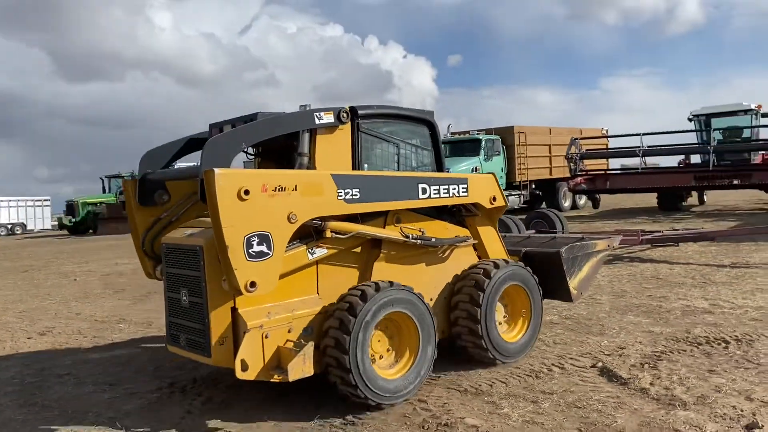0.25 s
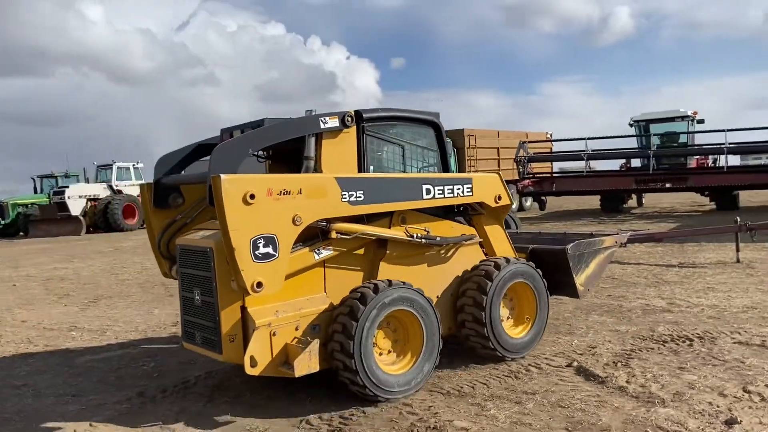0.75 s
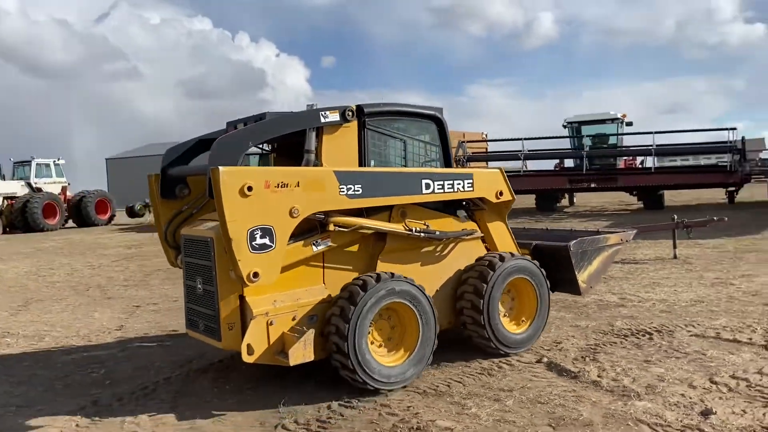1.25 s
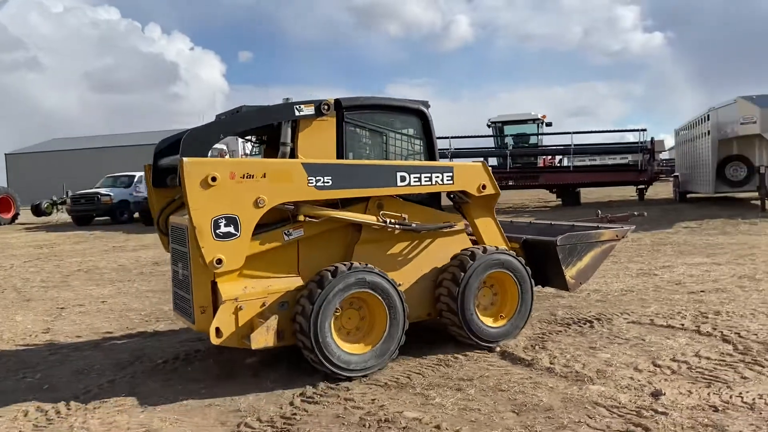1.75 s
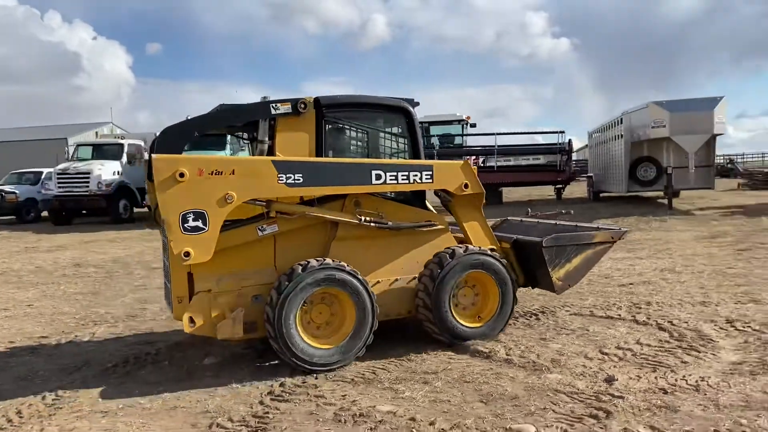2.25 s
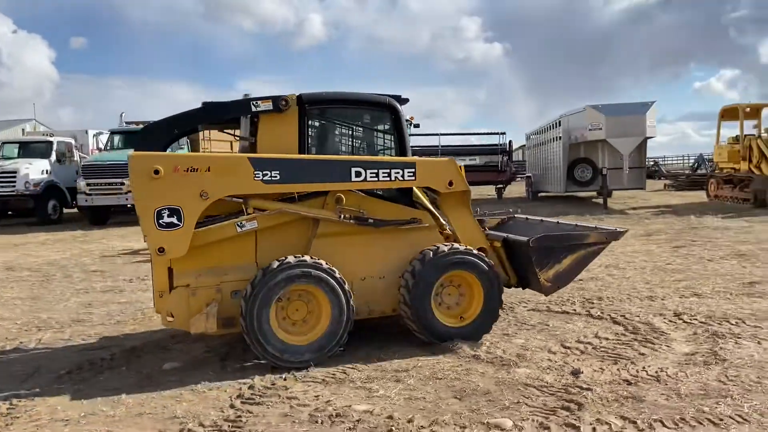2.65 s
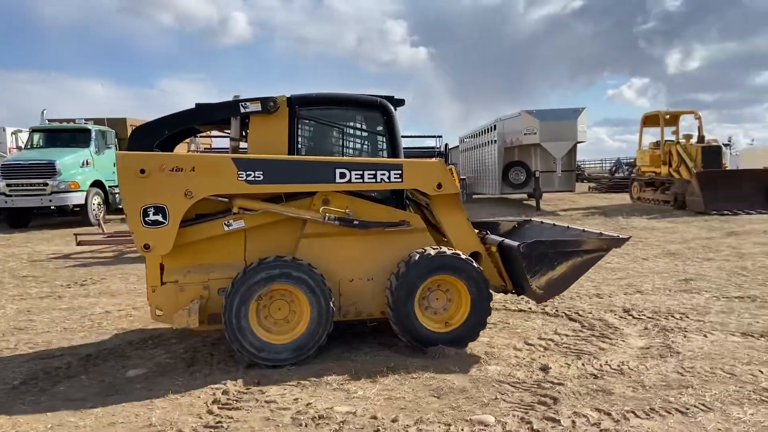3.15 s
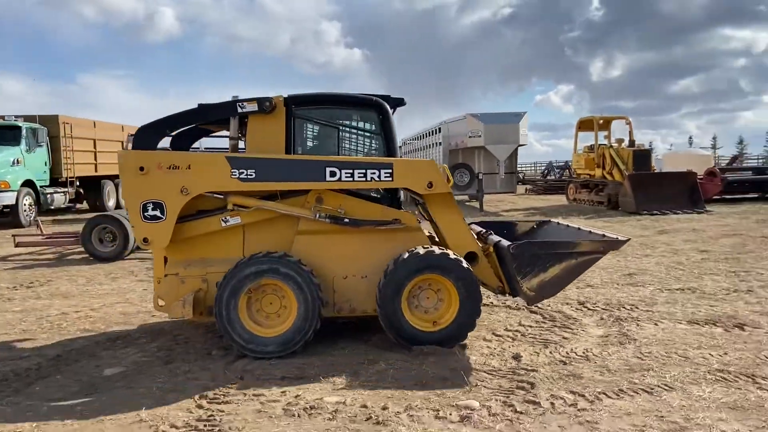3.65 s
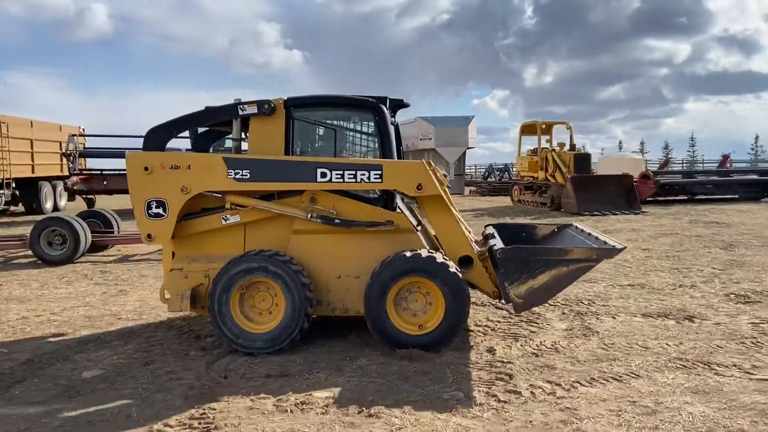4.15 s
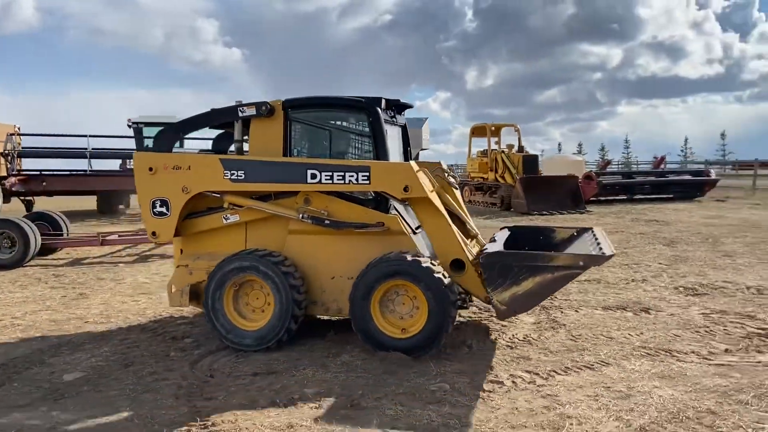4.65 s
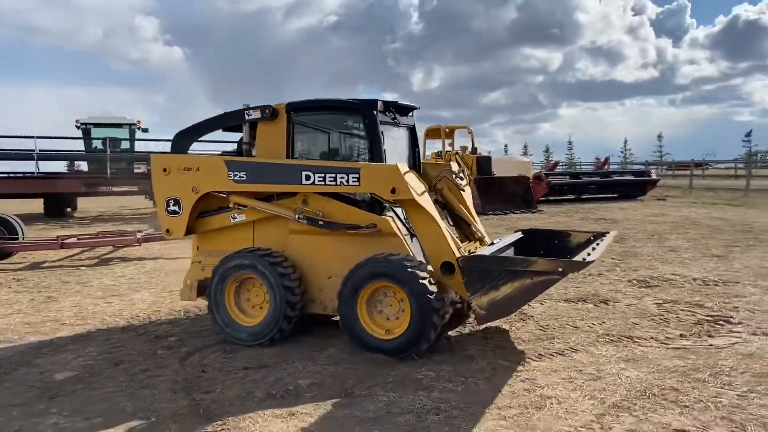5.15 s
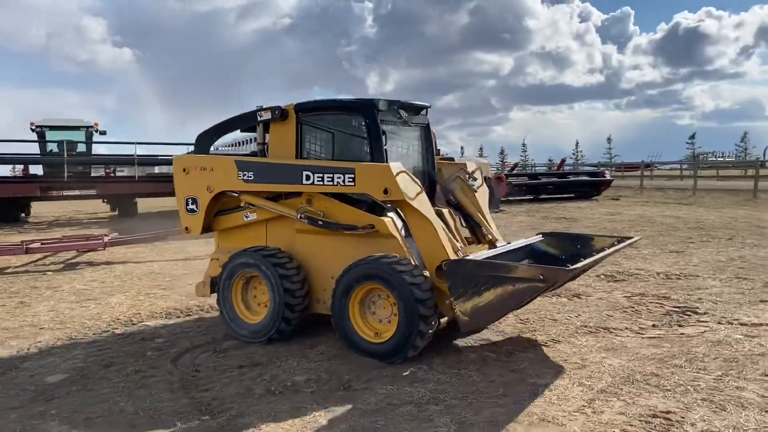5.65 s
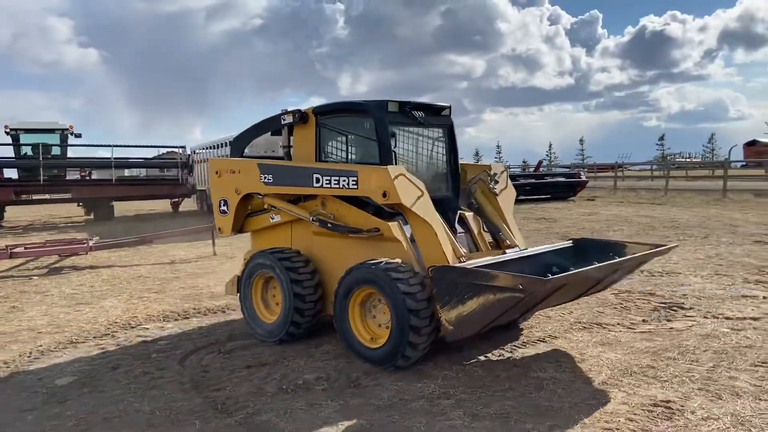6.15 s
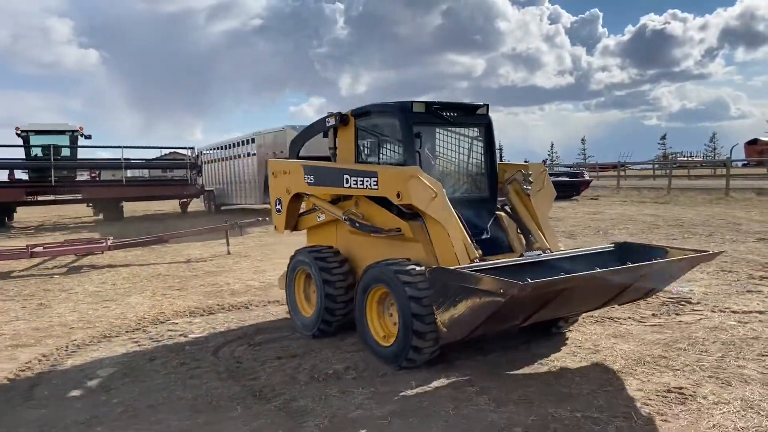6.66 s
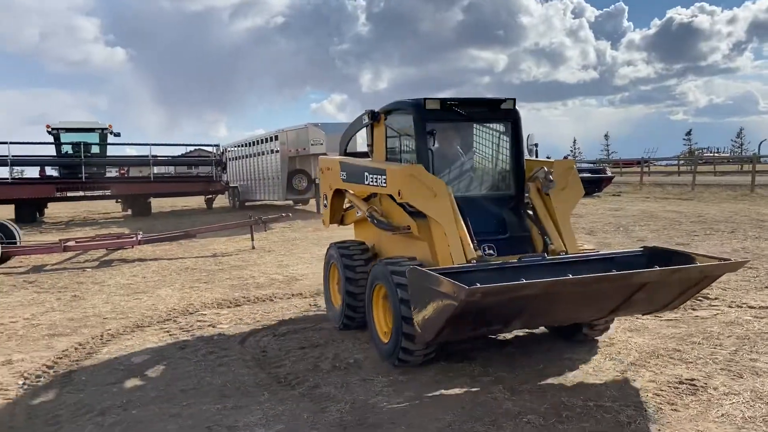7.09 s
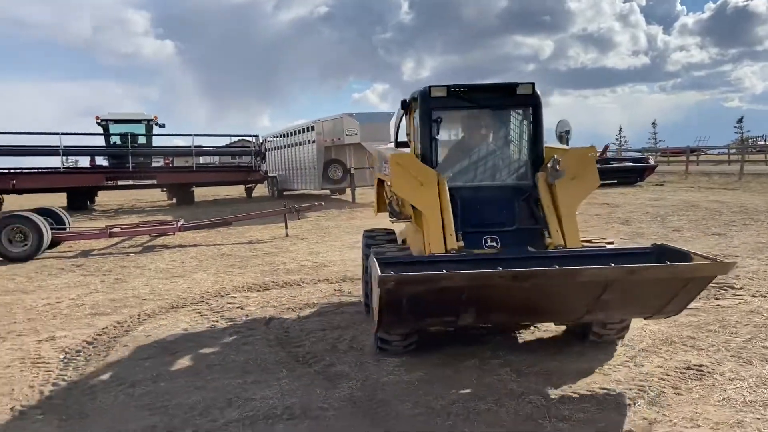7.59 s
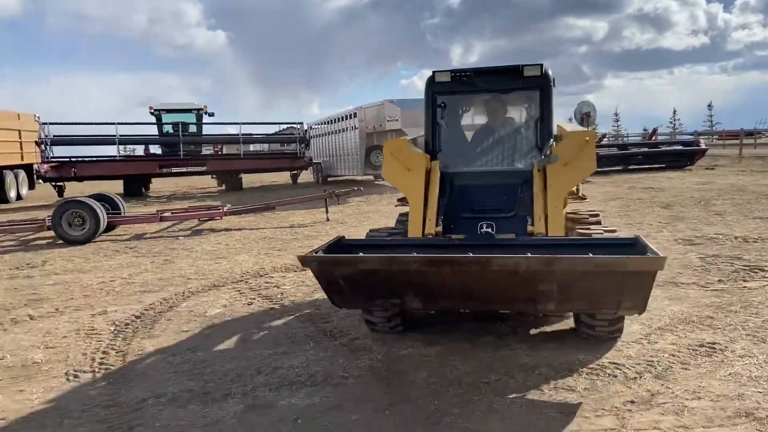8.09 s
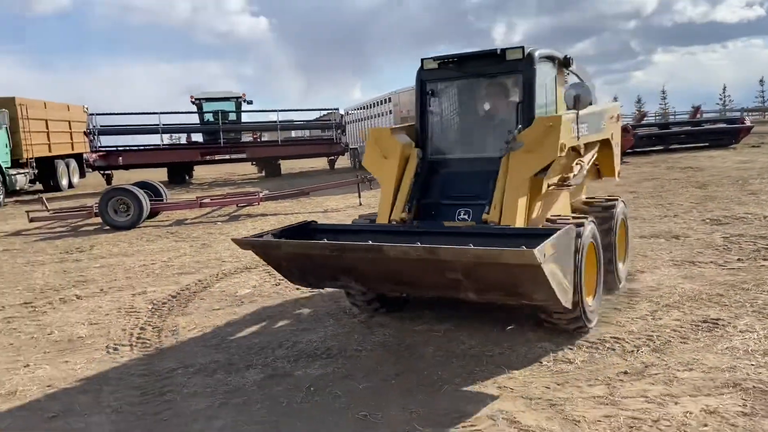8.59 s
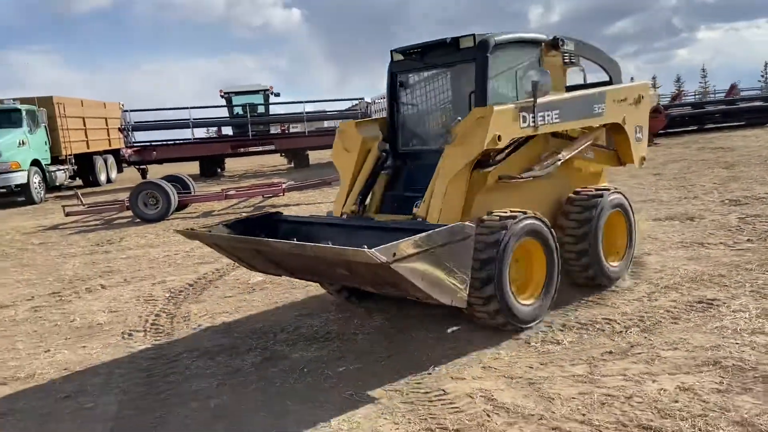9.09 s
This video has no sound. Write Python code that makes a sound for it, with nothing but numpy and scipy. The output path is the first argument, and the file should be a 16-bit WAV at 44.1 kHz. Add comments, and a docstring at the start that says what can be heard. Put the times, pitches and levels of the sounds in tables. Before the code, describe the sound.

Steady diesel engine chug with fan roar, hydraulic whine and metallic clatter as a small loader swings around, amid thumping wind gusts.

```python
"""In an open dirt yard a five-cylinder diesel loader at nearly steady revs turns round, a few metres away.
Sines locked to the engine cycle make the exhaust drone, the whine of a nine-piston pump and the gear whines.
Blows ring the panels of the clattering block; shaped noise makes the fan roar, a rattle and a hiss.
Wind noise buffets and flutters at two microphone ports, and short sagging swings flap there.
The drone dips briefly at listed moments, mostly after gusts."""
import sys
import numpy as np
from scipy import signal
from scipy.fft import rfft, irfft, next_fast_len
from scipy.io import wavfile
from scipy.ndimage import uniform_filter1d, map_coordinates

SR = 44100
rng = np.random.default_rng(int(sys.argv[2]) if len(sys.argv) > 2 else 0)


def int16_out(signal):
    """Quantize to a 16-bit WAV file."""
    q = np.round(np.clip(np.atleast_2d(signal).T, -1, 1) * 32767)
    wavfile.write(sys.argv[1], SR, q.astype(np.int16))


N = 411453
T = np.arange(N) / SR  # time in seconds
FADE_DB_PER_S, WHINE_FADE_DB_PER_S, FLUTTER_FADE_DB_PER_S = 32, 84, 264  # how fast a swell comes and goes


# Engine speed. Each row: time in seconds, four-stroke cycles a second (two crank turns, five firings each).
SPEED = [(0, 15.14), (.4, 15.15), (.7, 15.1), (1.1, 15.08), (1.5, 15.0), (1.95, 15.0), (2.3, 15.06),
         (2.7, 15.04), (3.4, 15.03), (4.3, 15.055), (4.7, 15.02), (5.5, 15.06), (6.7, 15.04), (7.1, 15.06),
         (7.9, 15.045), (8.5, 15.075), (9.33, 15.07)]


def engine_cycles():
    """Phase is the integral of rate: cycles run so far, with a slight random wander."""
    cycles_per_s, = curves(SPEED)
    return np.cumsum(cycles_per_s) / SR - .05 + .004 * wobble(2.5)


# Firing tone. Each row: time in seconds, level in dB before the dips.
FIRING = [(0.0, -18), (0.41, -22), (0.48, -12), (2.15, -11), (2.6, -14), (2.75, -14), (3.05, -13.5),
          (3.28, -13.5), (3.5, -22), (4.03, -18.5), (4.3, -22.5), (4.68, -14), (5.6, -13), (6.0, -17),
          (6.4, -14.5), (6.8, -17), (7.27, -20), (7.59, -31), (7.98, -15), (8.6, -14.5), (9.33, -12.5)]
# Brief dips of the firing tone. Each row: time in seconds, depth in dB.
DIPS = [(1.01, 2), (2.23, 9), (2.831, 19), (2.93, 20), (3.33, 22), (3.39, 14), (3.66, 24), (3.9, 20),
        (4.18, 18), (6.08, 35), (6.97, 16), (8.16, 3), (9.04, 26)]
DIP_FALL_S, DIP_RECOVER_S = 0.024, 0.045  # time constants
# 2nd and 4th multiples of the firing tone.
# Each holds: rest in dB under the roar, then swells of start in seconds, end in seconds, level in dB.
SECOND = (-15.5, [(.95, 2.0, -27), (2.2, 3.2, -31), (4.75, 5.95, -26.5), (6.3, 6.7, -27.5),
          (7.3, 7.4, -32.5), (9.0, 9.33, -32.5)])
FOURTH = (-13, [(1.05, 1.2, -33), (6.0, 6.1, -34), (7.35, 7.4, -33.5), (9.2, 9.33, -26)])


def exhaust_drone(cycles):
    """Harmonic series of a periodic source: five firings a cycle give a tone and its multiples."""
    firing_db, = curves(FIRING)
    for s, depth_db in DIPS:
        time_constant = np.where(T < s, DIP_FALL_S, DIP_RECOVER_S)
        firing_db = firing_db - depth_db * np.exp(-np.abs(T - s) / time_constant)
    levels = firing_db, turning(SECOND, FADE_DB_PER_S), turning(FOURTH, FADE_DB_PER_S)
    return sum(tone(5 * k, cycles, db) for k, db in zip((1, 2, 4), levels))


# Piston tone, then its 3rd, 4th, 5th and 7th multiples.
# Each row: rest in dB under the roar, then swells of start in seconds, end in seconds, level in dB.
PUMP = [(-17, [(.9, 1.2, -34), (1.95, 2.5, -30), (4.7, 5.05, -31.5), (6.3, 7.2, -35.5), (7.65, 8.7, -31.5),
        (9.25, 9.33, -30.5)]), (-24, [(1.7, 1.85, -36), (4.5, 6.0, -52), (7.7, 8.3, -41.5),
        (8.6, 9.1, -42.5)]), (-22, [(5.55, 5.8, -39.5), (8.75, 9.0, -45)]), (-19, [(0.0, .1, -35.5),
        (1.6, 2.2, -40), (5.1, 5.9, -42), (6.3, 6.8, -43), (7.85, 8.1, -41), (8.45, 8.8, -40.5),
        (8.1, 8.4, -44.5)]), (-18, [(.7, 1.5, -44), (5.3, 6.0, -44), (7.9, 8.1, -45), (8.7, 9.05, -46)])]
# 2nd multiple of the piston tone, the clearest whine: rest and swells in the same units.
WHINE = (-20, [(.38, .45, -30), (.5, 1.6, -36.5), (3.7, 4.03, -34), (4.18, 4.35, -36), (4.5, 5.1, -32),
         (5.95, 6.75, -31), (7.33, 7.4, -33.5), (8.1, 8.15, -37), (8.45, 8.55, -35.5), (8.95, 9.33, -33.5)])


def pump_whine(cycles):
    """Flow ripple: nine pistons a crank turn pulse 18 times a cycle, with multiples."""
    levels = [turning(part, FADE_DB_PER_S) for part in PUMP]
    levels.append(turning(WHINE, WHINE_FADE_DB_PER_S))
    return sum(tone(18 * k, cycles, db) for k, db in zip((1, 3, 4, 5, 7, 2), levels))


# Pitch of each gear whine, in multiples of the engine cycle.
GEAR_ORDERS = (69, 80, 109, 119, 42, 115, 105, 125)
# Mean level of each gear whine.
# Each row: rest in dB under the roar, then swells of start in seconds, end in seconds, level in dB.
GEARS = [(-25.5, [(.5, .6, -57), (1.4, 2.3, -43.5), (3.3, 4.4, -42.5), (5.7, 5.9, -48.5)]),
         (-28.5, [(1.5, 2.7, -40.5), (3.3, 4.7, -44)]), (-18, [(0.0, .6, -31), (1.3, 2.4, -36.5),
         (4.8, 5.15, -42), (5.5, 6.1, -42), (6.9, 7.3, -41.5), (9.1, 9.33, -44)]),
         (-17.5, [(.75, 1.1, -34.5), (1.2, 1.5, -29), (1.5, 2.05, -36.5), (2.7, 3.15, -49), (4.0, 4.1, -45),
         (5.3, 5.7, -43), (7.0, 7.3, -43)]), (-25.5, [(0.0, 1.8, -37.5), (5.4, 7.2, -43.5)]),
         (-18.5, [(4.4, 5.7, -42), (6.3, 7.2, -42.5)]), (-21.5, [(1.55, 1.95, -42), (2.4, 2.8, -41),
         (5.7, 6.0, -41), (8.3, 9.0, -46)]), (-26.5, [(.8, 1.6, -40)])]
# Tooth load of each gear. Each row: depth of its swell (0-1), place of the swell in the cycle (0-1).
LOADS = [(.3, 0), (.3, 0), (.5, .22), (.75, .38), (.4, .08), (.4, .3), (.3, .2), (.3, 0)]


def gear_whine(cycles):
    """Amplitude modulation of tooth-mesh tones: the tooth load swells once a cycle."""
    out = 0
    for order, part, (depth, place) in zip(GEAR_ORDERS, GEARS, LOADS):
        load = 1 + depth * np.cos(2 * np.pi * (cycles - place))
        level_db = turning(part, FADE_DB_PER_S) + 2 * wobble(9)
        out = out + load * tone(order, cycles, level_db)
    return out


# Relative blow strength in dB of each firing in turn.
CYLINDERS = [-13.5, 10, -1.5, 8.5, 0]


def firing_knocks(cycles):
    """Impulsive excitation: one blow a firing, unequal from cylinder to cylinder."""
    firing = (cycles * 5).astype(int)
    begins = np.diff(firing, prepend=0) > 0
    return begins * amp(np.array(CYLINDERS)[firing % len(CYLINDERS)] + 1.6 * wobble(75))


TICKS_DRIFT = .13  # turns a second by which the tick pattern changes


def valve_ticks(cycles):
    """Cyclic repetition: a noise pattern fixed to the cycle, turning slowly into another one."""
    slots = 2900  # noise values in one cycle
    place = (cycles % 1 * slots).astype(int)
    first, second = rng.standard_normal((2, 2, slots))[..., place]
    angle = 2 * np.pi * TICKS_DRIFT * T
    return np.cos(angle) * first + np.sin(angle) * second


# Modes of each panel. Each row, mode by mode: centre in Hz, width in Hz before squaring, level in dB.
PANELS = [
    [(632, 70, 0)],
    [(815, 115, 0)],
    [(1580, 18, -12), (1652, 40, 0)],
    [(1725, 30, 0)],
    [(1792, 42, 0)],
    [(1885, 30, -2), (1955, 30, -4), (2030, 40, 0), (2150, 150, -7)],
    [(2343, 40, 0)],
    [(3750, 700, 0)],
    [(5600, 1200, 0)],
]
# Mean level of each panel, which swells as it faces the listener.
# Each row: rest in dB under the roar, then swells of start in seconds, end in seconds, level in dB.
FACING = [(-21.5, [(0.0, 1.2, -34.5), (5.5, 5.6, -44), (7.2, 7.35, -42.5)]), (-16, [(.7, 1.2, -41.5),
          (4.4, 7.2, -36.5), (7.55, 7.9, -46)]), (-14, [(0.0, .3, -29), (1.25, 1.75, -32.5),
          (4.7, 6.1, -37.5)]), (-16, [(0.0, .8, -36), (4.4, 7.5, -37.5)]), (-21.5, [(1.1, 2.0, -32),
          (2.6, 3.3, -44), (3.8, 4.2, -41.5), (5.3, 5.7, -38.5), (7.0, 7.3, -37)]), (-17, [(0.0, 1.6, -33),
          (3.0, 3.3, -43), (2.15, 2.4, -33.5), (5.0, 7.6, -40.5), (7.0, 7.48, -34.5), (8.75, 9.1, -39.5)]),
          (-25, [(0.0, 1.4, -35)]), (-37, [(0.0, 2.03, -47), (2.9, 7.1, -52.5)]),
          (-46.5, [(7.0, 7.4, -57.5), (8.2, 9.0, -63)])]
# Place in the cycle (0-1) at which each panel is struck hardest.
STRUCK_AT = [.08, .56, .24, .3, .38, .0, .0, .0, .0]
STRUCK_DB = 2.2  # swing of the blows over the cycle, up and down


def panel_response(modes, f):
    """Modal resonance, squared: stiff panels radiate little away from their modes."""
    return sum(amp(db / 2) * 1j * f * w / (c * c - f * f + 1j * f * w) for c, w, db in modes) ** 2


def clatter(cycles, ticks):
    """Modal excitation: firing knocks, valve ticks and loose noise ring the panels."""
    blows = .6 * unit(firing_knocks(cycles)) + ticks + .55 * rng.standard_normal((2, N))
    blows = patchy(blows, 2.5, bins=2, frames=40)
    out = 0
    for modes, facing, place in zip(PANELS, FACING, STRUCK_AT):
        struck = blows * amp(STRUCK_DB * np.cos(2 * np.pi * (cycles - place)))
        ring = filtered(struck, lambda hz: panel_response(modes, hz))
        out = out + amp(turning(facing, FADE_DB_PER_S)) * even(ring)
    return out * amp(wobble(8))


# Roar spectrum. Each row: frequency in Hz, relative level in dB per Hz.
ROAR = [(150, -53), (350, -3.5), (640, 3.5), (950, 0), (1310, 2), (1480, 1.5), (2300, -5), (2700, -50.5),
        (5000, -120)]
# Hiding of the engine bay by the cab. Each row: time in seconds, share hidden (0-1).
SHADE = [(0, 0.07), (4.4, 0), (6.2, 0.8), (8.6, 0.93), (9.33, 0.55)]
# Gain of the hidden share. Each row: frequency in Hz, gain in dB.
SHADOW = [(800, 0.5), (1000, -3), (1250, -3), (1500, -1.5), (2000, 2.5)]


def fan_roar(cycles, ticks):
    """Broadband noise, partly repeating with the cycle so faint lines show, then acoustic shadow of the cab."""
    roar = noise(ROAR) + 1.1 * coloured(ticks, ROAR)
    roar = unit(patchy(roar, 2.0, bins=5, frames=40) * beat(cycles, 0.22, 0.22))
    shade = np.clip(curves(SHADE)[0], 0, 1)
    return (1 - shade) * roar + shade * coloured(roar, SHADOW)


# Rattle spectrum. Each row: frequency in Hz, relative level in dB per Hz.
RATTLE = [(1800, -65), (2400, 2.5), (2750, -4.5), (3200, -2), (3700, -12.5), (4300, -32), (7000, -120)]


def rattle_noise(cycles, ticks):
    """Cyclic modulation: band noise, partly repeating, beats with cycle and firing."""
    rattle = noise(RATTLE) + 0.78 * coloured(ticks, RATTLE)
    return unit(patchy(rattle, 2.7, bins=5, frames=30) * beat(cycles, 0.25, 0.3))


# Hiss spectrum. Each row: frequency in Hz, relative level in dB per Hz.
HISS = [(2800, -60), (3900, -8), (4600, -1), (5000, 0), (6300, -4), (6900, -2), (7200, 2), (7600, -2),
        (9000, -5), (9700, -10), (11000, -11), (12400, -16), (14800, -20), (15300, -28), (16000, -30)]


def hiss_noise(cycles):
    """Amplitude modulation of high noise: it beats with the cycle and flickers at random."""
    flicker = amp(0.65 * wobble(8) + 0.73 * wobble(4))
    hiss = patchy(noise(HISS), 1.5, bins=8, frames=25)
    return unit(hiss * beat(cycles, 0.94, 0.63) * flicker)


# A squeak and a clank of steel.
# Each row: start in seconds, level in dB before rise and decay, pitch in Hz, rise in seconds, t60 in seconds.
PINGS = [(1.766, -27.5, 4360, 0.0051, 0.095), (8.372, -14, 630, 0.0048, 0.087),
         (8.37, -18, 900, 0.005, 0.062)]


def squeak():
    """Free decay: loose steel parts ring as sines that rise softly and die exponentially."""
    out = 0
    for s, db, hz, rise, t60 in PINGS:
        t = np.maximum(T - s, 0)
        decay = amp(db - 60 * t / t60)
        out = out + decay * (1 - np.exp(-t / rise)) ** 2 * np.sin(2 * np.pi * hz * t)
    return out


# Levels of the body noise. Each row: time in seconds, roar in dB before the cab's shadow, rattle in dB,
# hiss in dB.
BODY = [(0.0, -26, -36, -40), (1.38, -23, -37.5, -40), (1.97, -26, -41, -42), (3.14, -28.5, -47, -46.5),
        (4.31, -28.5, -44, -44.5), (4.91, -31, -46, -46), (7.25, -29.5, -44, -46), (7.59, -35, -48, -55),
        (8.37, -34.5, -47.5, -53.5), (9.33, -30.5, -41.5, -46.5)]
# Likeness of the ports. Each row: frequency in Hz, correlation of the body sound (0-1).
ALIKE = [(300, .9), (2000, .88), (2800, .65), (3500, .8), (5500, .4), (7500, .75), (8400, 1), (10000, 1),
         (10800, .7), (11800, 1), (13300, 1), (13800, .5), (14300, 1)]


def engine():
    """Superposition of all that the machine radiates, before it reaches the ports."""
    cycles = engine_cycles()
    ticks = valve_ticks(cycles)
    roar_db, rattle_db, hiss_db = curves(BODY)
    body = clatter(cycles, ticks) + amp(roar_db) * fan_roar(cycles, ticks)
    body = body + amp(rattle_db) * rattle_noise(cycles, ticks) + amp(hiss_db) * hiss_noise(cycles)
    tones = exhaust_drone(cycles) + pump_whine(cycles) + gear_whine(cycles)
    return blend(body, ALIKE) + tones + squeak()


# Side of the machine. Each row: time in seconds, direction from left (0) to right (1).
TURN = [(0, 0), (4.5, 0), (6.5, 0.16), (7.2, 0.36), (7.9, 0.67), (8.5, 1), (9.33, 1)]
# Phase between the ports for either side. Each row: frequency in Hz, lead of the left port in radians.
LEAD_LEFT = [(100, 0), (700, .2), (1400, .7), (1800, 1.3), (2400, 1.4), (2750, .9), (3100, -.2),
             (4800, -.3), (5500, 1.2), (6800, .8), (7250, 1.6), (8400, 3.14), (10000, 3.14), (11600, 6.28),
             (13400, 6.28), (14200, 9.42)]
LEAD_RIGHT = [(100, 0), (700, -.2), (1400, -.3), (1800, -1), (2400, -1.3), (5500, -1), (6200, -.1),
              (6900, 0), (7750, 2.6), (8400, 3.14), (10000, 3.14), (11600, 6.28), (13400, 6.28),
              (14200, 9.42)]
# Level between the ports for either side. Each row: frequency in Hz, left minus right in dB.
TILT_LEFT = [(1400, 0), (2400, -1), (3000, 3), (3700, -1), (4200, -2), (5200, -9), (6200, -2), (7200, 3),
             (8200, 0)]
TILT_RIGHT = [(300, 0), (1000, -4), (2400, -4), (3000, -6), (3700, -2), (5500, -4), (6500, 0)]


def seen(x, lead, tilt):
    """Interaural-style cues: half of the phase and level difference goes to each port."""
    half = np.array([[.5], [-.5]])
    return filtered(x, lambda hz: amp(half * along(tilt, hz)) * np.exp(1j * half * along(lead, hz)))


def ports(x):
    """Directional cues: phase and level differences shift as the machine swings across."""
    turn = np.clip(curves(TURN)[0], 0, 1)
    return (1 - turn) * seen(x, LEAD_LEFT, TILT_LEFT) + turn * seen(x, LEAD_RIGHT, TILT_RIGHT)


# Wind levels. Each row: time in seconds, buffet in dB, flutter in dB at rest between bursts.
WIND = [(0.0, -23, -36.5), (0.7, -24.5, -28), (0.85, -21, -26.5), (0.95, -17, -26), (1.9, -19, -30.5),
        (2.2, -18, -30), (2.9, -15, -36.5), (3.28, -16.5, -39), (3.38, -21, -32), (3.5, -19.5, -24.5),
        (3.7, -26, -37), (4.08, -21, -28), (4.45, -24.5, -31.5), (4.75, -23, -29), (5.5, -22, -30.5),
        (5.8, -19, -31.5), (6.75, -18.5, -30.5), (7.0, -22.5, -26), (7.25, -19, -35.5), (7.4, -14, -35),
        (7.5, -26, -29), (7.75, -34.5, -42.5), (8.2, -24, -31.5), (9.0, -17.5, -28), (9.33, -23, -30)]
# Buffet and flutter spectra. Each row: frequency in Hz, relative level in dB per Hz.
BUFFET = [(12, -48.5), (25, -27.5), (55, -1), (78, -1.5), (105, -2.5), (140, -9), (250, -13.5),
          (450, -26.5), (1500, -120)]
FLUTTER = [(60, -61), (170, -0.5), (290, 1), (450, -8), (750, -11), (1200, -26.5), (3000, -120)]
# Bursts of flutter. Each row: start in seconds, end in seconds, level in dB.
GUSTS = [(2.91, 2.94, -24), (3.32, 3.397, -31), (3.474, 3.516, -25), (6.137, 6.2, -25.5),
         (6.662, 6.69, -23), (7.33, 7.414, -18.5), (7.443, 7.454, -21.5), (8.578, 8.62, -26),
         (8.98, 9.0, -27)]


def wind():
    """Turbulent pressure at the ports: lumpy low buffeting, a faster flutter with the gusts, and flaps."""
    buffet_db, flutter_db = curves(WIND)
    lumps = amp(1.45 * wobble(14) + np.array([wobble(12), wobble(30)]))
    buffet = blend(unit(noise(BUFFET) * lumps), [(100, 0.71)])
    flutter = blend(unit(noise(FLUTTER) * amp(2.75 * wobble(40))), [(100, 0.8)])
    flutter_db = swells(flutter_db, GUSTS, FLUTTER_FADE_DB_PER_S)
    return amp(buffet_db) * buffet + amp(flutter_db) * flutter + flaps()


FLAP_WIDTH, FLAP_SAG = 0.54, 0.26  # half-width in cycles, share of the pitch lost per cycle
EDGE_DB, EDGE_RATIO, EDGE_LEAD = -10, 2.1, .5  # crisp front: dB re swing, pitch over swing, cycles ahead
EDGE_TOP_HZ = 700  # highest pitch of a front


def swing(u, phase):
    """Chirped wave packet: a sagging sine over u cycles, in quadrature between two rows."""
    turns = u - FLAP_SAG * u * u / 2 + phase
    return np.exp(-.5 * (u / FLAP_WIDTH) ** 2) * np.sin(2 * np.pi * turns + [[0], [np.pi / 2]])


# Flaps of the wind. Each row: middle in seconds, peak of the dull swing in dB before blending, pitch in Hz.
FLAPS = [(1.122, -12, 233), (1.326, -10, 233), (1.778, -14, 187), (2.914, -5.5, 190), (2.938, -0.5, 352),
         (2.944, -2, 160), (3.065, -7, 230), (3.144, -5, 162), (3.167, -10, 262), (3.215, -9, 202),
         (3.3, -15, 217), (3.316, -4, 251), (3.321, -7.5, 251), (3.332, -4.5, 215), (3.388, -3.5, 386),
         (3.415, -10.5, 200), (3.476, -9, 170), (3.493, -8.5, 383), (3.498, -12, 212), (3.523, -13, 560),
         (4.1, -14, 150), (4.171, -13, 262), (5.681, -11, 174), (5.912, -7, 139), (6.016, -4, 249),
         (6.02, -10, 560), (6.032, -8, 188), (6.151, -10, 400), (6.164, -7, 217), (6.673, -6, 236),
         (7.309, -3.5, 217), (7.317, -6, 336), (7.33, -8.5, 630), (7.333, -10, 360), (7.349, -2.5, 234),
         (7.35, -9, 560), (7.363, -20, 270), (7.377, -3, 420), (7.378, -7.5, 173), (7.397, -4, 362),
         (7.404, -1.5, 430), (7.41, -7, 251), (7.418, -5.5, 450), (7.446, -6, 480), (7.451, -19, 250),
         (7.462, -12.5, 800), (8.337, -8.5, 250), (8.884, -12, 405), (8.982, -9, 537), (8.994, -8, 217)]


def flaps():
    """Transient wave packets: eddies slap the ports, a crisp front and then a dull sagging swing."""
    out, half = np.zeros((2, N + SR)), SR // 40
    t = np.arange(-half, half) / SR
    for (s, db, hz), phase in zip(FLAPS, rng.random((len(FLAPS), 2))):
        ratio = min(EDGE_RATIO, EDGE_TOP_HZ / hz)
        edge = amp(EDGE_DB) * swing(ratio * (hz * t + EDGE_LEAD), phase[1])
        start = round(s * SR) - half
        out[:, start:start + len(t)] += amp(db) * (swing(hz * t, phase[0]) + edge)
    return blend(out[:, :N], [(100, 0.59)])


def amp(db):
    """Decibel law: gain of a level in dB."""
    return 10 ** (np.asarray(db) / 20)


def unit(x):
    """Root mean square: x at rms 1."""
    return x / np.sqrt(np.mean(x ** 2) + 1e-20)


def even(x):
    """Running rms: x held near rms 1 over every half second."""
    power = uniform_filter1d(np.mean(x ** 2, axis=0), size=SR // 2)
    return x / np.sqrt(np.abs(power) + 1e-20)


def along(points, hz):
    """Logarithmic frequency scale: (Hz, value) points joined on a log axis."""
    f, v = np.transpose(points)
    return np.interp(np.log(hz + 1), np.log(f + 1), v)


def curves(rows):
    """Linear interpolation: one value per sample for each column after the time."""
    s, *cols = np.transpose(rows)
    return [np.interp(T, s, c) for c in cols]


def wobble(rate):
    """Band-limited randomness: a smooth random curve, rate knots a second."""
    return map_coordinates(rng.standard_normal(int(N * rate / SR) + 4), [T * rate])


def swells(rest_db, spans, fade):
    """Envelope in dB: at rest, but held up over each span and fading off on both sides."""
    held = [db - fade * np.maximum(np.maximum(a - T, T - b), 0) for a, b, db in spans]
    return np.max([rest_db] + held, axis=0)


def turning(layer, fade):
    """Directivity: a part rests under the roar and swells as the machine turns."""
    under_db, spans = layer
    return swells(curves(BODY)[0] + under_db, spans, fade)


def tone(order, cycles, db):
    """Order locking: a sine at a multiple of the engine cycle, db = rms level."""
    return np.sqrt(2) * amp(db) * np.sin(2 * np.pi * (order * cycles + rng.random()))


def beat(cycles, cycle_db, fire_db):
    """Periodic modulation: a gain swinging with the cycle and with the firings."""
    return amp(cycle_db * np.cos(2 * np.pi * cycles) + fire_db * np.cos(10 * np.pi * cycles))


def filtered(x, response):
    """Linear filtering: x times a complex response of frequency."""
    m = next_fast_len(N + SR // 4)
    return irfft(rfft(x, m) * response(np.fft.rfftfreq(m, 1 / SR)), m)[..., :N]


def coloured(x, spectrum):
    """Spectral shaping: x with the gains of (Hz, dB) points."""
    return filtered(x, lambda hz: amp(along(spectrum, hz)))


def noise(spectrum):
    """Incoherent sources: two unrelated rows of coloured noise."""
    return coloured(rng.standard_normal((2, N)), spectrum)


def patchy(x, depth_db, bins, frames):
    """Time-frequency modulation: a slowly shifting random gain over both."""
    z = signal.stft(x, nperseg=1024)[2]
    field = uniform_filter1d(rng.standard_normal(z.shape[1:]), bins, 0)
    field = uniform_filter1d(field, frames, 1)
    return signal.istft(z * amp(depth_db * unit(field)), nperseg=1024)[1][:, :N]


def blend(pair, alike):
    """Coherence: left and right from a shared and an opposed row, as alike as asked."""
    turn = lambda hz: np.arccos(np.clip(along(alike, hz), -1, 1)) / 2
    mid, side = filtered(pair, lambda hz: np.array([np.cos(turn(hz)), np.sin(turn(hz))]))
    return np.array([mid + side, mid - side])


def scene():
    """Superposition: the loader and the wind at the two ports."""
    return ports(engine()) + wind()


TOP_HZ = 15750  # band limit


def record(dry):
    """Soft saturation and band limiting: peaks are rounded off, nothing is kept from TOP_HZ up."""
    soft = dry / (1 + np.abs(dry) ** 4) ** (1 / 4)
    return filtered(soft, lambda hz: hz < TOP_HZ)


dry = scene()
out = record(dry)
int16_out(out)
```